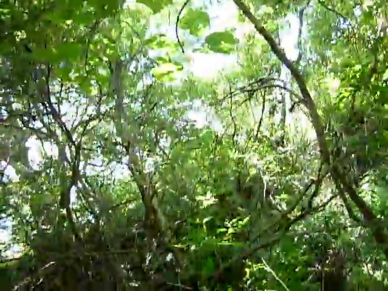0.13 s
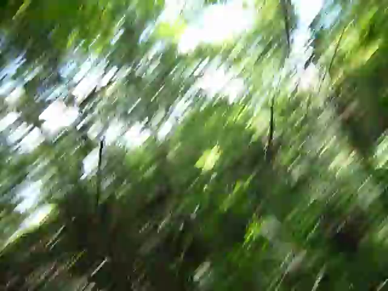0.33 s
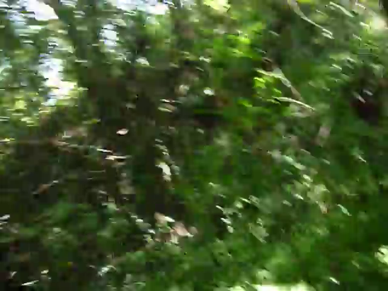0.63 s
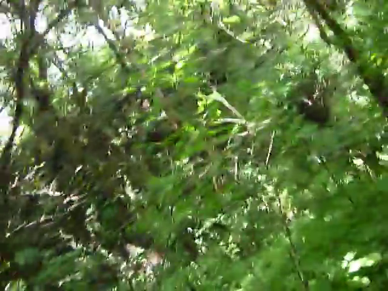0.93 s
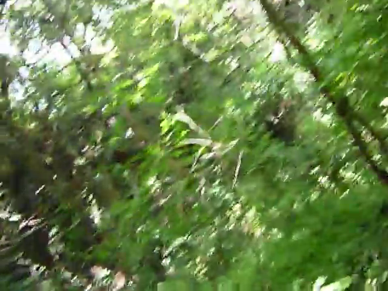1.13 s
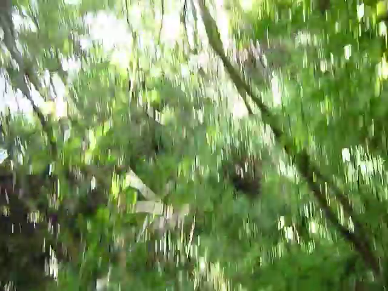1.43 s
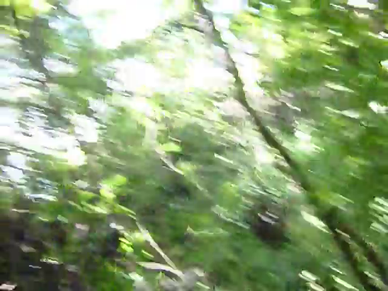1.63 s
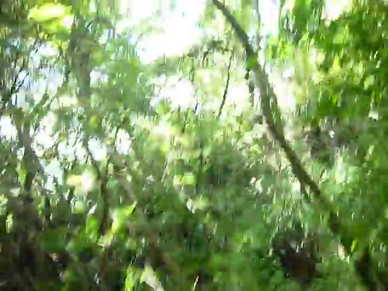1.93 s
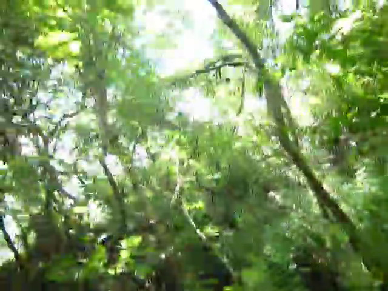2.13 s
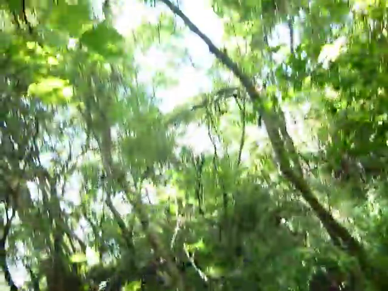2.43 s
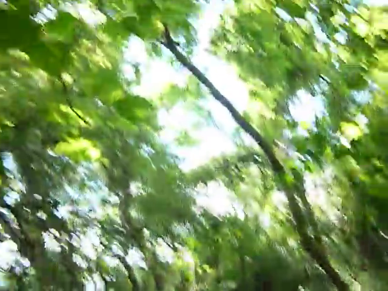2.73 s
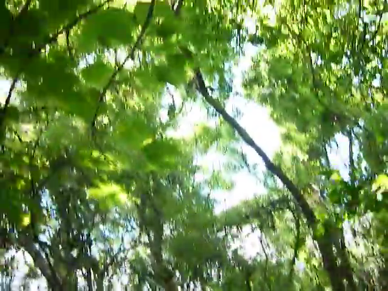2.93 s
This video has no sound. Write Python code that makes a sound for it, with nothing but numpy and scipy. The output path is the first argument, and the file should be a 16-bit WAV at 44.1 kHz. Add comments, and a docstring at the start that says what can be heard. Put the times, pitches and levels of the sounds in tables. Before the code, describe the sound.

Rough, guttural howler monkey barks come one after another in woodland, the later ones spaced wider. Faint throbbing insect hiss continues throughout, with close handling rubs, thuds and ticks on the microphone, busiest in the final second.

```python
"""Howler monkey in the forest

A howler monkey barks over and over from the trees: uneven pulses and puffs of air through the resonances
of a large throat, joined by wavering hoots, ring on in a short tail of scattered echoes.
Insects hiss high above, as a narrow throbbing band of noise, over soft forest air and a faint far tone.
Close by, a hand bumps the microphone's housing (short rings, thuds and ticks) and rubs it (coloured noise)."""
import sys
import numpy as np
from scipy import signal
from scipy.fft import rfft, irfft
from scipy.io import wavfile
from scipy.ndimage import uniform_filter1d

SR = 44100
rng = np.random.default_rng(int(sys.argv[2]) if len(sys.argv) > 2 else 0)


def file_out(sig):
    """Save sig as 16-bit WAV at sys.argv[1]."""
    # one column per channel
    cols = np.atleast_2d(sig).T
    # limit, then scale
    lim = np.clip(cols, -1, 1)
    pcm = np.round(lim * 32767).astype(np.int16)
    wavfile.write(sys.argv[1], SR, pcm)


N = 135387
LEAD = SR // 4  # samples of run-up ahead of time 0, trimmed off in scene()
TIME = np.arange(-LEAD, N) / SR


def from_db(db):
    """Decibels to gain."""
    return 10 ** (np.asarray(db) / 20)


def rms_one(x):
    """Scale to rms 1."""
    return x / np.sqrt(np.mean(x ** 2) + 1e-20)


def white():
    """White noise for the whole scene."""
    return rng.standard_normal(len(TIME))


def level(rows):
    """Gain that follows a curve of (time [s], level [dB])."""
    return from_db(np.interp(TIME, *np.transpose(rows)))


def cut(x, hz, kind, order=4):
    """Butterworth low- or high-pass."""
    return signal.sosfilt(signal.butter(order, hz, kind, fs=SR, output="sos"), x)


def drift(hz):
    """Random motion slower than about hz, of rms 1."""
    return rms_one(cut(white(), hz, "low", order=2))


def coloured(points):
    """Noise of rms 1 shaped by a curve of (frequency [Hz], level [dB per Hz])."""
    hz, db = np.transpose(points)
    bins = np.fft.rfftfreq(len(TIME), 1 / SR)
    gain = from_db(np.interp(np.log(bins + 1), np.log(hz), db))
    return rms_one(irfft(rfft(white()) * gain, len(TIME)))


def resonate(x, hz, width):
    """A resonance with steep skirts (two in series), gain about 1 on top."""
    r = np.exp(-np.pi * width * np.sqrt(2) / SR)
    b = (1 - r * r) / 2 * np.array([1, 0, -1])
    a = [1, -2 * r * np.cos(2 * np.pi * hz / SR), r * r]
    once = signal.lfilter(b, a, x + 1e-18)
    return signal.lfilter(b, a, once)


def tract(x, resonances):
    """Resonances of the voice in parallel, signs alternating."""
    return sum((-1) ** k * from_db(db) * resonate(x, hz, width)
               for k, (hz, width, db) in enumerate(resonances))


def even(x, size=800):
    """Hold the short-term level at 1, over a window of size samples."""
    return x / np.sqrt(np.abs(uniform_filter1d(x * x, size=size)) + 1e-12)


def swell(start, length, attack, release):
    """Attack, hold and release, with rounded corners; all times in seconds."""
    rise = np.clip((TIME - start) / attack, 0, 1)
    fall = np.clip((start + length - TIME) / release, 0, 1)
    return uniform_filter1d(rise * fall, size=200)


def barks():
    """Uneven glottal pulses and puffs of air drive a low growl, a rasp, a buzz, a hiss and a thin wheeze."""
    # barks: (start [s], length [s], attack [s], pulse rate [Hz], growl [dB], chest [dB], mouth [dB],
    #         rasp [dB], buzz pitch [Hz], buzz [dB], hiss [dB], wheeze [dB]); chest and mouth against throat
    bark_rows = [(-.2, 0.25, .04, 135, -29, -8, 2, -52, 2150, -70, -51, -78),
                 (0.19, 0.22, 0.036, 128, -23.5, -25, 5.5, -39, 2110, -43, -42.5, -55),
                 (0.539, 0.21, 0.022, 138.1, -22, -5, 6.5, -39.5, 2080, -45.5, -41.5, -58),
                 (0.947, 0.22, 0.0097, 137, -24.5, 0.5, 8, -44, 2194, -53, -44.5, -58.5),
                 (1.581, .24, 0.16, 130.2, -21.5, -5, 4.5, -44, 2230, -50, -46, -52),
                 (2.109, 0.23, 0.096, 117, -23.5, -8.5, -4.5, -53, 2290, -65, -55.5, -56)]
    # resonances of chest, throat and mouth: (centre [Hz], width [Hz], level [dB])
    chest = [(155, 21, -16.5), (241.5, 61, 1.5)]
    throat = [(309, 106, -1.5), (397, 64, -2), (515, 127, -5.5)]
    mouth = [(675.5, 117, -3.5), (729, 200, -17.5)]
    # upper resonances that carry the rasp and the breathy hiss: (centre [Hz], width [Hz], level [dB])
    rasp = [(1130, 150, -5), (1396, 96, 2.5)]
    hiss = [(3155, 138, -1), (3557, 69, 3.5), (5460, 400, -9.5), (5825, 92, 2), (6300, 160, -1.5)]
    release_s, rasp_attack_s, rasp_release_s = 0.13, 0.21, 0.13
    onset_share = 0.23  # part of the level that is there within 15 ms
    onset_jitter, jitter, breakup_s = 0.02033, 0.065, 0.05  # a bark starts more regular and breaks up
    shimmer_db = 3.5  # spread of the pulse strength
    growl_noise, rasp_noise = 0.33, 0.99  # amount of puffs in each source
    growl_low_hz, growl_high_hz = 140, 816
    buzz_width_hz = 84
    wheeze_hz, wheeze_width_hz, wheeze_delay_s = 3858, 80, 0.017
    wheeze_stretch = 1.07  # length of the wheeze against that of the bark
    lock_share, lock_lead_s = 0.36, 0.092  # the growl thins by this share towards the end of a bark

    out = 0
    for (start, length, attack, hz, growl_db, chest_db, mouth_db,
         rasp_db, buzz_hz, buzz_db, hiss_db, wheeze_db) in bark_rows:
        unevenness = np.interp(TIME, [start, start + breakup_s], [onset_jitter, jitter])
        cycles = np.cumsum(hz * (1 + unevenness * drift(90))) / SR
        clicks = np.diff(np.floor(cycles), prepend=0)
        pulses = rms_one(clicks * from_db(shimmer_db * drift(170)))
        puffs = rms_one(white() * np.exp(-2.5 * (cycles % 1)))  # breath fades within each cycle
        source = pulses + growl_noise * puffs
        airy = rasp_noise * puffs + (1 - rasp_noise) * pulses

        growl = tract(source, throat)
        growl = growl - from_db(chest_db) * tract(source, chest)
        growl = growl - from_db(mouth_db) * tract(source, mouth)
        growl = even(cut(cut(growl, growl_low_hz, "high"), growl_high_hz, "low"), size=1300)

        upper = from_db(rasp_db) * even(tract(airy, rasp))
        upper = upper + from_db(hiss_db) * even(tract(airy, hiss))
        upper = upper + from_db(buzz_db) * even(resonate(airy, buzz_hz, buzz_width_hz))

        wheeze = even(resonate(puffs, wheeze_hz, wheeze_width_hz))
        wheeze = wheeze * swell(start + wheeze_delay_s, length * wheeze_stretch, 0.0045, release_s)

        gate = onset_share * swell(start, length, 0.015, release_s)
        effort = gate + (1 - onset_share) * swell(start, length, attack, release_s)
        strain = gate + (1 - onset_share) * swell(start, length, rasp_attack_s, rasp_release_s)
        thinning = swell(start + length - lock_lead_s, length, 0.01, release_s)
        effort = effort * (1 - lock_share * thinning)
        out = out + from_db(growl_db) * effort * growl + strain * upper + from_db(wheeze_db) * wheeze
    return out


def hoots():
    """The voice locks into clean, wavering tones, each with an octave and a weaker third harmonic."""
    # hoots: (start [s], length [s], first pitch [Hz], last pitch [Hz], level [dB],
    #         octave against the fundamental [dB])
    hoot_rows = [(-.06, 0.08, 365, 353.2, -26, -39), (.002, 0.05, 700, 707, -36, -33),
                 (0.053, 0.072, 340, 344, -45, -33), (0.245, 0.032, 300, 341, -18, -30),
                 (0.301, 0.036, 310, 323, -24, -29), (.303, 0.03, 690, 680, -21.5, -42),
                 (0.343, 0.063, 685, 706, -26.5, -30), (0.355, 0.03, 340.7, 330, -20.5, -15.5),
                 (0.554, 0.064, 337, 302, -21.5, -22.5), (0.619, 0.075, 315.1, 326, -23, -37),
                 (.59, .07, 680, 695, -22, -14), (0.667, 0.064, 730, 666, -27, -27),
                 (0.725, 0.061, 340, 348, -33, -21.5), (0.765, 0.053, 700, 704, -56, -35),
                 (0.97, 0.081, 305, 343.4, -22.5, -16.5), (0.981, 0.068, 690, 696, -27.5, -13.5),
                 (1.027, 0.081, 312, 312.5, -22, -18), (1.065, 0.036, 685, 697, -18.5, -46),
                 (1.095, 0.069, 690, 676, -26.5, -34), (1.145, 0.064, 335, 350, -31.5, -36),
                 (1.674, 0.045, 350, 324, -22.5, -10.5), (1.7, 0.031, 688, 671, -28.5, -10),
                 (1.726, 0.035, 660, 651, -24, -38), (1.732, .07, 359.8, 346, -29.5, -27),
                 (1.741, 0.036, 275, 261, -26.5, -33.5), (2.147, 0.061, 356.2, 365, -30, -16),
                 (2.189, 0.084, 364.7, 337, -21.5, -23), (2.18, 0.031, 645, 653, -24.5, -30),
                 (2.264, 0.043, 667.4, 640, -32, -29), (2.281, 0.039, 325, 305, -26, -20),
                 (2.302, 0.07, 312, 307, -34.5, -20)]
    fade_s, flutter_db, third_below_octave_db = 0.017, 1.15, -14
    wobble = 0.0246  # rms spread of the pitch, as a share of it

    out = 0
    for start, length, first_hz, last_hz, db, octave_db in hoot_rows:
        glide = np.interp(TIME, [start, start + length], [first_hz, last_hz])
        hz = glide * (1 + wobble * drift(70))
        phase = 2 * np.pi * np.cumsum(hz) / SR
        overtones = np.sin(2 * phase) + from_db(third_below_octave_db) * np.sin(3 * phase)
        tone = np.sqrt(2) * (np.sin(phase) + from_db(octave_db) * overtones)
        strength = from_db(db + flutter_db * drift(63))
        out = out + strength * swell(start, length, fade_s, fade_s) * tone
    return out


def forest(x):
    """Trunks and leaves scatter the voice into a short, grainy tail."""
    low_t60_s, high_t60_s = 0.38, 0.37  # time to fall by 60 dB
    scatter_db, scatter_delay_s = -12.5, 0.025  # the tail builds up over the delay
    t = np.arange(SR) / SR
    sparse = rng.random(SR) < 1500 / SR  # about 1500 echoes a second
    echoes = rng.standard_normal(SR) * sparse * np.clip(t / scatter_delay_s, 0, 1) ** 2
    low = cut(echoes, 1100, "low", order=1)
    high = echoes - low
    tail = low * 1000 ** (-t / low_t60_s) + high * 1000 ** (-t / high_t60_s)
    tail = tail / np.linalg.norm(tail)
    return x + from_db(scatter_db) * signal.fftconvolve(x, tail)[:len(x)]


def handling():
    """Short knocks ring the housing, each with a scuff, a thud and a tick, over uneven rubbing."""
    # bumps on the housing: (time [s], level [dB], ring pitch [Hz], decay by 60 dB [s],
    #                        thud [dB], tick [dB]); thud and tick against the bump's level
    bumps = [(.173, -37.5, 1275, 0.031, -7, -3), (.5025, -30, 1190, .02, -36, -30),
             (1.169, -36.5, 900, 0.028, -15, -14), (1.199, -38.5, 1500, 0.0084, -27, -16),
             (1.411, -40, 830, .05, -7, -14), (1.529, -57, 1830, 0.017, -17, 1),
             (2.395, -36.5, 1650, 0.013, -5, -13), (2.3985, -25, 806, .025, -3.5, -29),
             (2.407, -36, 890, 0.068, -9, -14.5), (2.6125, -28, 640, 0.01, -35, -35),
             (2.715, -35, 775, 0.032, -5, -30), (2.75, -38, 850, 0.027, -8, -27),
             (2.764, -39, 870, 0.023, -3, -26), (2.795, -50, 1510, .05, -17, -18),
             (2.835, -32, 1146, 0.023, -7, -25), (2.841, -39, 1740, 0.01, -26, -11),
             (2.884, -50, 1500, .012, -15, -3)]
    # the hand rubbing: (time [s], level [dB])
    rubbing = [(0, -59.5), (.19, -59), (.28, -36.5), (.4, -51), (.85, -58), (1.3, -56.5), (1.55, -49),
               (1.85, -50.5), (2.05, -53), (2.36, -46), (2.5, -58), (2.66, -52), (2.77, -48), (2.92, -55),
               (3.07, -53)]
    # spectrum of the rubbing: (frequency [Hz], level [dB per Hz])
    rub_colour = [(100, -17), (350, 3), (800, -1), (1300, -4), (2200, -9.5), (4000, -17.5), (8000, -21)]
    scuff_share = 0.41  # noise against clean ring
    scuff_width_share = 0.53  # bandwidth of the scuff against the ring's pitch
    thud_hz, thud_width_hz = 197, 110

    out = level(rubbing) * coloured(rub_colour) * from_db(2.0 * drift(35))
    for start, db, hz, t60, thud_db, tick_db in bumps:
        age = np.maximum(TIME - start, 0)
        ring = np.sqrt(2) * np.sin(2 * np.pi * hz * age)
        scuff = even(resonate(white(), hz, hz * scuff_width_share), size=200)
        thud = even(resonate(white(), thud_hz, thud_width_hz), size=400)
        tick = rms_one(resonate(white(), 2400, 4000))
        rise = np.minimum(age / 0.001, 1)
        fade = rise * 1000 ** (-np.maximum(age - 0.002, 0) / t60)
        body = (1 - scuff_share) * ring + scuff_share * scuff
        out = out + from_db(db) * fade * (body + from_db(thud_db) * thud + from_db(tick_db) * tick)
    return out


def insects():
    """A narrow high hiss that throbs with the insects' fast pulsing."""
    # the insects overhead: (time [s], level [dB])
    insect_level = [(0, -63), (.38, -56), (.7, -60), (1.25, -59), (1.4, -54.5), (1.65, -60), (1.8, -55),
                    (3.07, -54)]
    # spectrum of their hiss: (frequency [Hz], level [dB per Hz])
    insect_colour = [(6000, -33), (7000, -18.5), (7450, -5), (7700, -5), (7950, -0.5), (8200, -6.5),
                     (8500, -25), (9000, -41.5)]
    pulse_hz, throb_depth = 60.5, 0.25
    phase = 2 * np.pi * np.cumsum(pulse_hz * (1 + 0.015 * drift(14))) / SR
    throb = 1 + throb_depth * (np.sin(phase) + 0.8 * np.cos(2 * phase))
    return level(insect_level) * rms_one(coloured(insect_colour) * throb)


def background():
    """Soft forest air as shaped noise, and a faint far tone as noise through a very narrow resonance."""
    # spectrum of the forest air: (frequency [Hz], level [dB per Hz])
    air_colour = [(30, -20), (70, -4), (150, 0.5), (300, 1), (600, -2), (1000, -12.5), (2000, -18.5),
                  (4000, -20), (7000, -21), (9000, -36.5)]
    # the faint far tone: (time [s], level [dB])
    hum_level = [(2.33, -58), (2.46, -47), (2.58, -51.5), (2.75, -56.5), (3.07, -68)]
    air_db, hum_hz, hum_width_hz = -53.5, 621, 11
    air = from_db(air_db) * coloured(air_colour)
    hum = level(hum_level) * even(resonate(white(), hum_hz, hum_width_hz))
    return air + hum


def scene():
    """The monkey among the trees, the hand at the microphone, the insects and the air."""
    voice = forest(barks() + hoots())
    return (voice + insects() + background() + handling())[None, LEAD:]


def record(dry):
    """The treble drops out for a moment; the microphone hisses faintly; the top is cut."""
    dull_start_s, dull_end_s, dull_hz, dull_db = 0.147, 0.372, 3640, -23.5
    mic_hiss_db, cutoff_hz = -66, 8600
    inside = (TIME > dull_start_s) & (TIME < dull_end_s)
    dull = uniform_filter1d(1.0 * inside, size=40)[LEAD:]
    muffled = signal.sosfiltfilt(signal.butter(12, dull_hz, fs=SR, output="sos"), dry)
    sound = dry + dull * (1 - from_db(dull_db)) * (muffled - dry)
    sound = sound + from_db(mic_hiss_db) * rng.standard_normal(N)
    return signal.sosfiltfilt(signal.butter(20, cutoff_hz, fs=SR, output="sos"), sound)


dry = scene()
out = record(dry)
file_out(out)
```